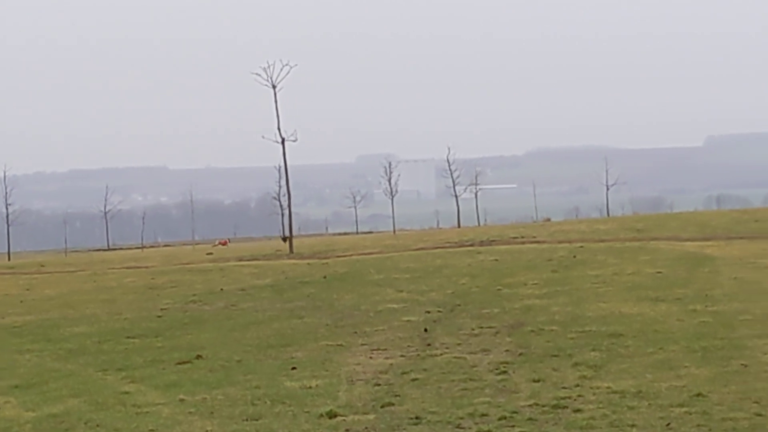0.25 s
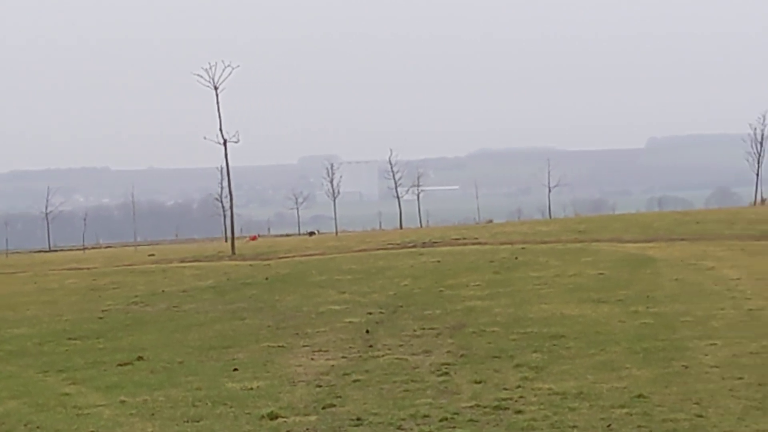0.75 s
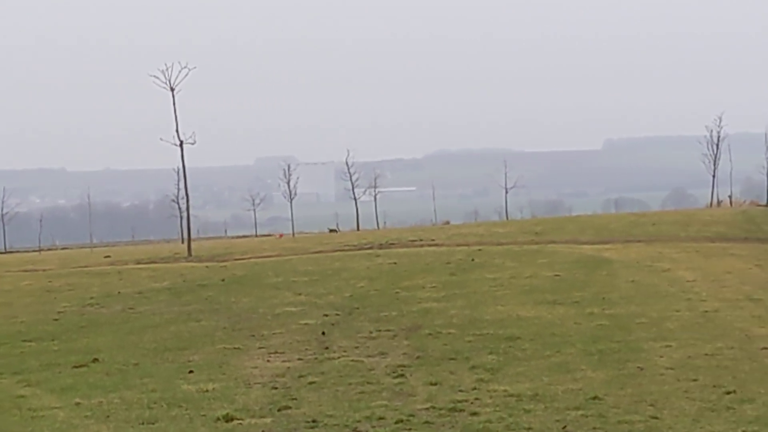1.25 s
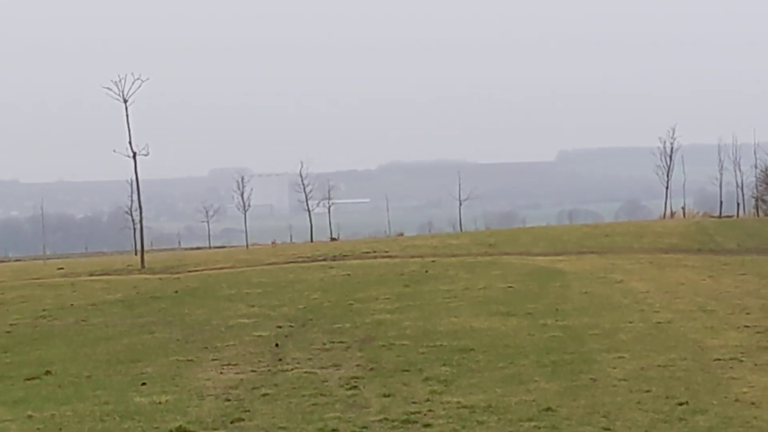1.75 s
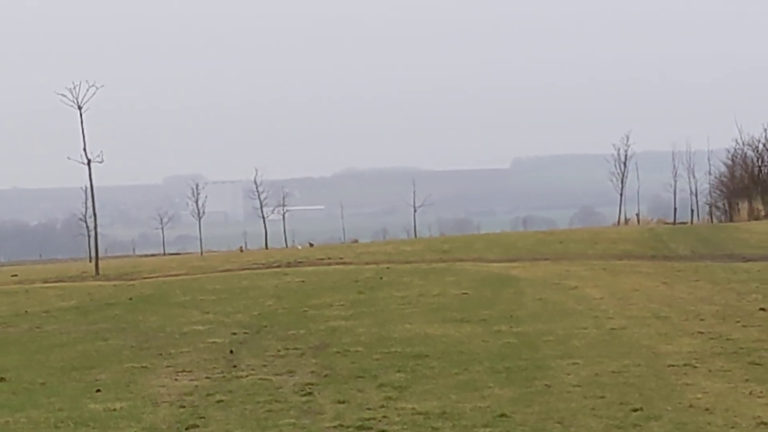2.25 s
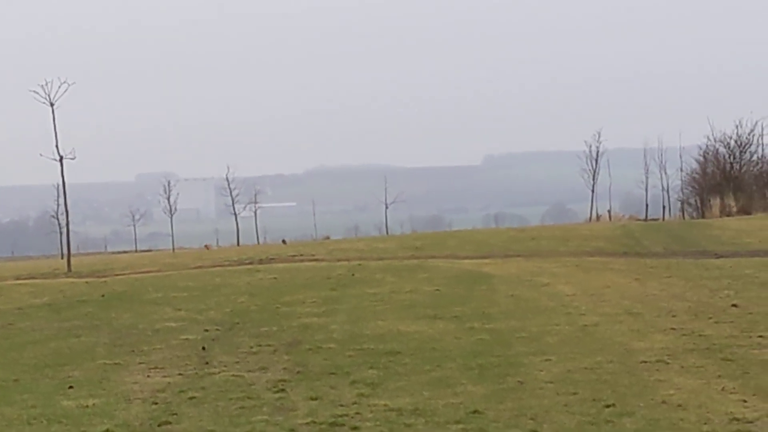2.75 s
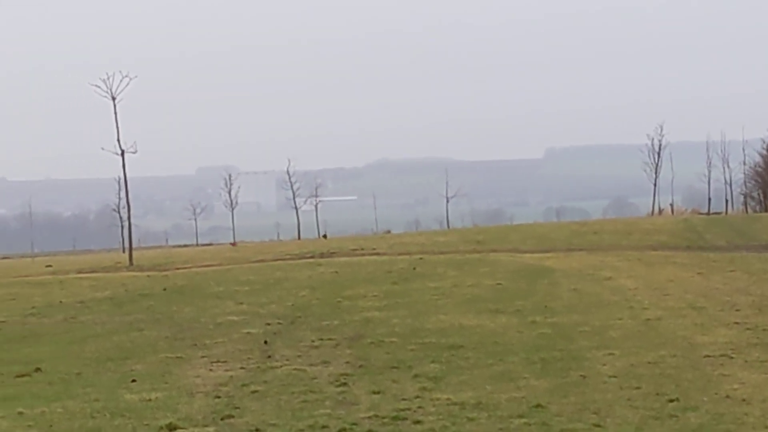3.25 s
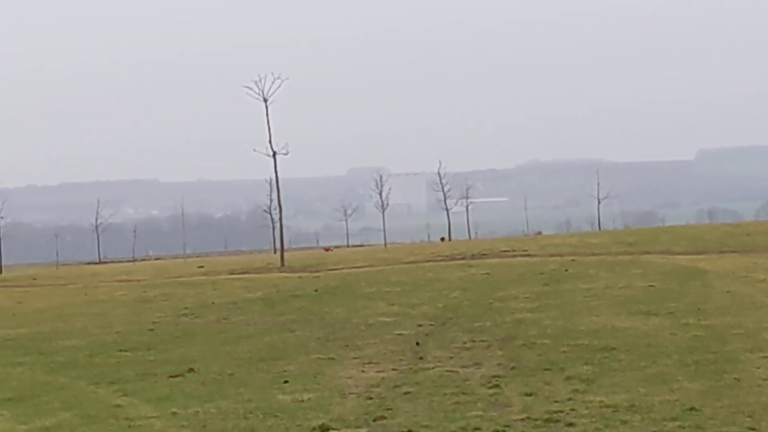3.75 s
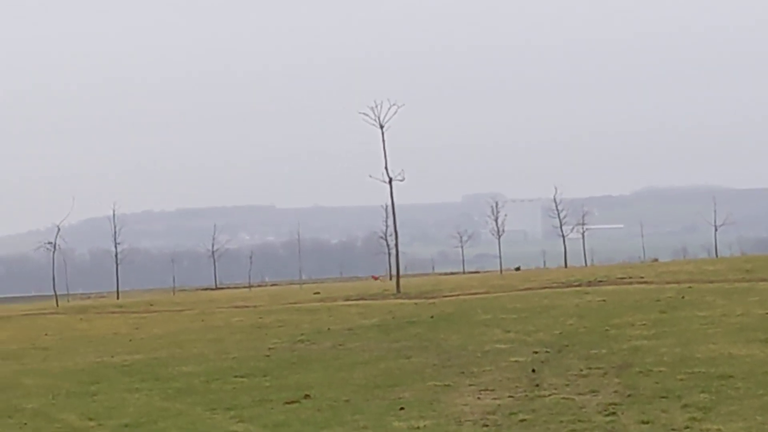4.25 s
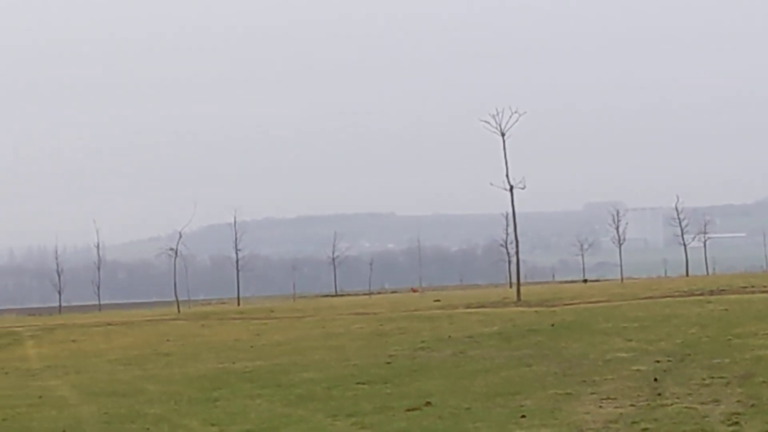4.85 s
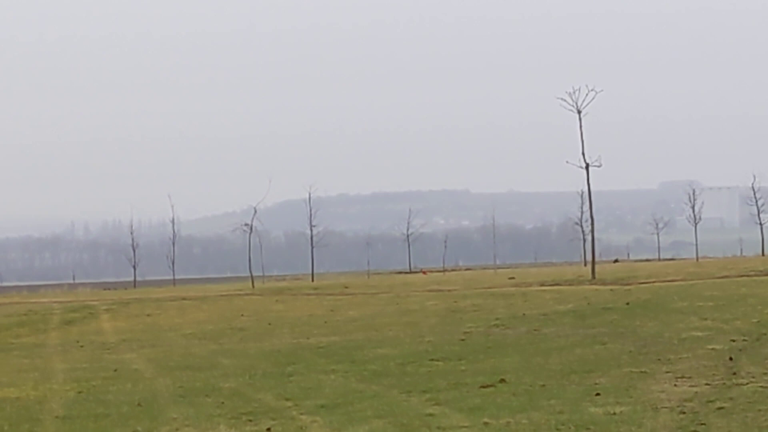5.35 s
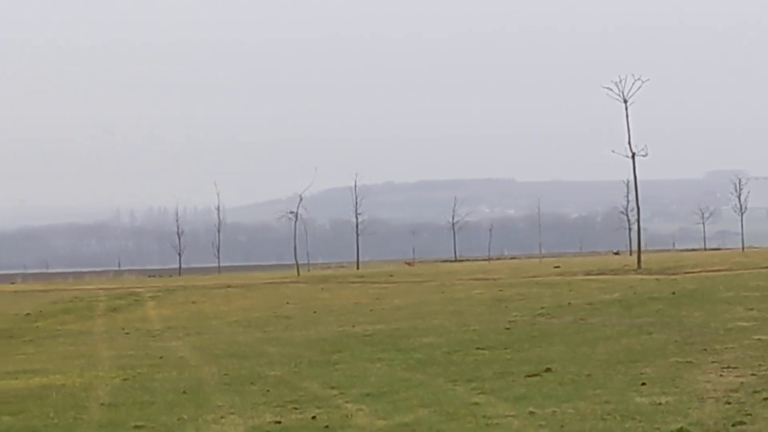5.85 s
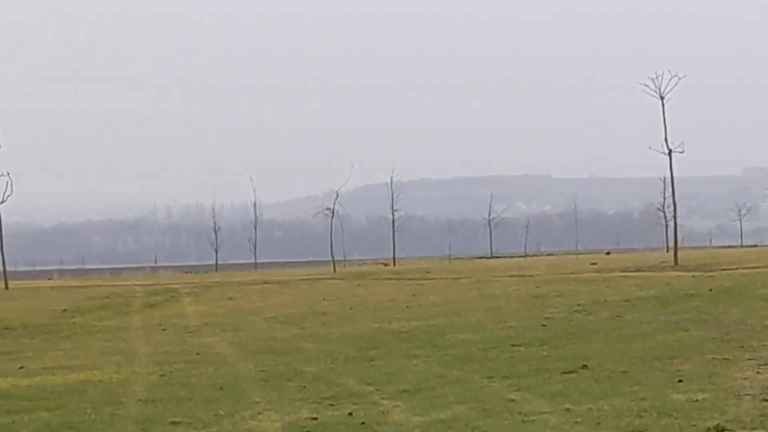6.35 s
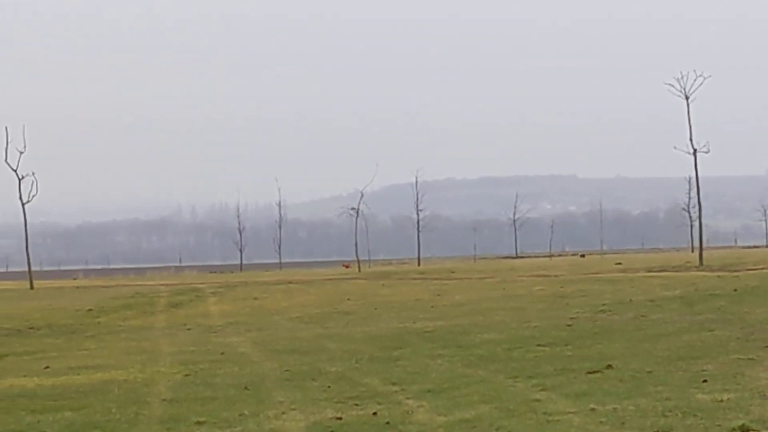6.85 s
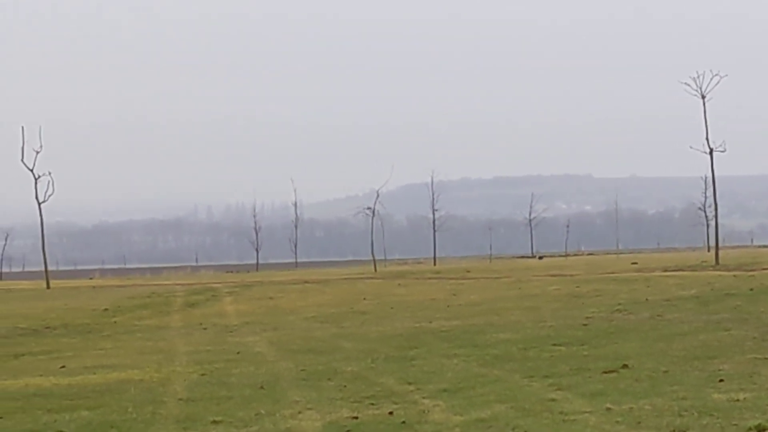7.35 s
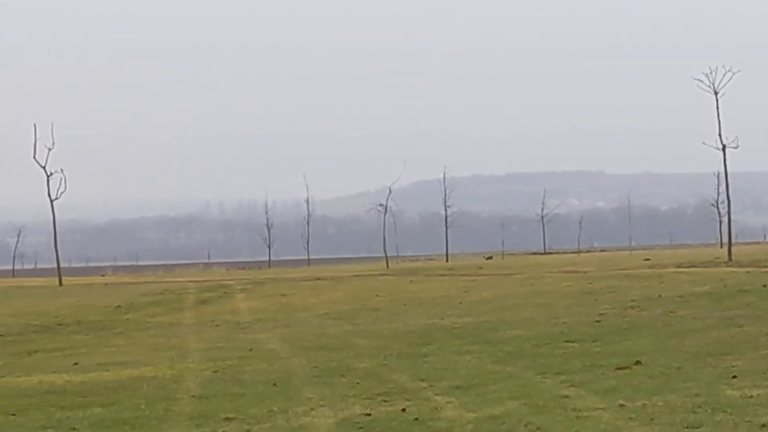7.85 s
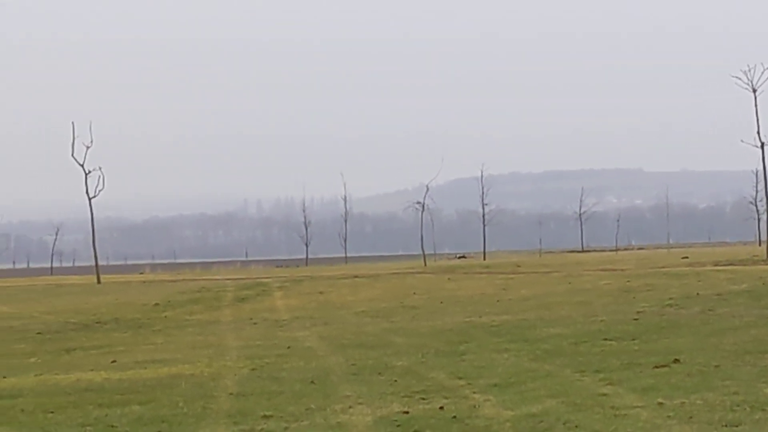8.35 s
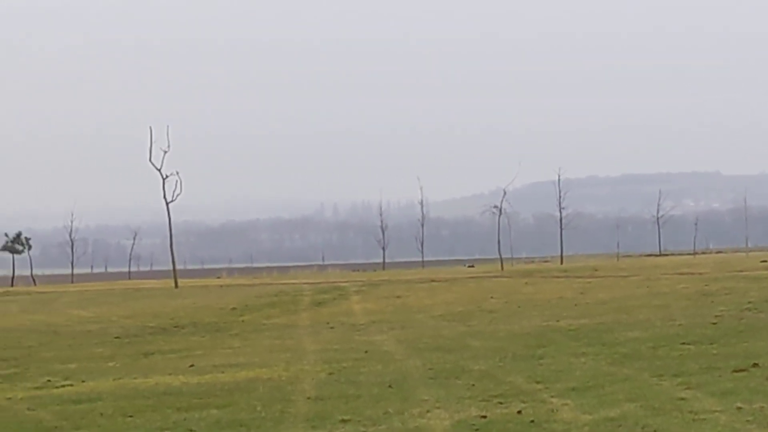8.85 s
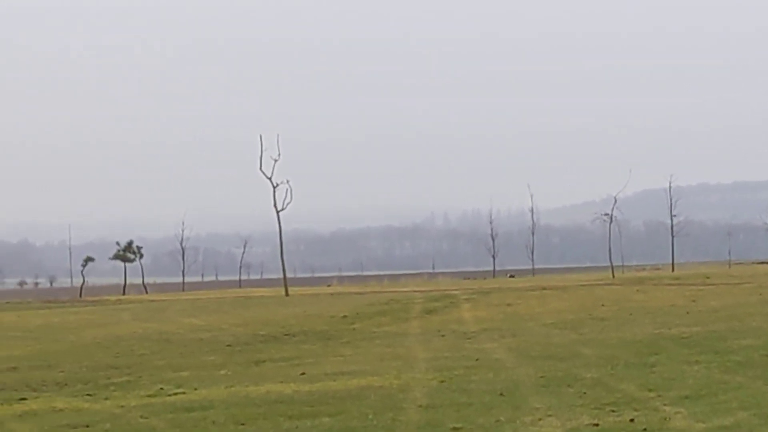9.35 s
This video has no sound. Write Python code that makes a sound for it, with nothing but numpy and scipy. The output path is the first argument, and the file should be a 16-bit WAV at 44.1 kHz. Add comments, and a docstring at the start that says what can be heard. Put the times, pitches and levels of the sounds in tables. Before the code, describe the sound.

A small single-cylinder engine idles close to a stereo microphone in an open field, running throughout about 9.6 seconds. It fires around eighteen times a second, slightly unevenly: dull low thuds with a short noisy bark and a bright, faint casing rattle. Underneath, a rotor hums near 90 to 100 hertz with buzzing overtones and thin hiss; it winds up at first, then sags and recovers every second or so. Wind hits the microphone in irregular low thumps: a heavy cluster from 1.2 to 2 seconds, lighter ones near 2.6, then a lull. At about 3.4 a single hoarse, high bird chirp rises and falls. Thumps return around 4.0 to 4.3, strongly near 5, and in a dense run from 6.0 to 7.1. Weaker, scattered buffets follow to 8.7, with one more near 9.3. The hum is fullest around 6.8, then its drone thins near 7.4. The engine is still running at the end.

```python
"""Engine idling in an open field

A small single-cylinder engine idles close to the microphone: each firing thuds in ringing exhaust modes,
barks as a puff of noise and rattles the casing. A rotor hums in sine partials and hisses in filtered
noise, sagging under each load and winding up again. Wind buffets the microphone in low thumps of noise,
and a bird chirps once, as a gliding sine."""
import sys
import numpy as np
from scipy import signal
from scipy.fft import rfft, irfft
from scipy.io import wavfile
from scipy.ndimage import uniform_filter1d, minimum_filter1d

SR = 44100
rng = np.random.default_rng(int(sys.argv[2]) if len(sys.argv) > 2 else 0)


def generate_wav(sig):
    """Save sig (samples, or channels by samples) to the path in sys.argv[1] as 16-bit PCM at SR."""
    pcm = np.round(np.clip(np.atleast_2d(sig).T, -1, 1) * 32767).astype(np.int16)
    wavfile.write(sys.argv[1], SR, pcm)


N = 423360
TIME = np.arange(N) / SR
FREQ = np.maximum(np.arange(N // 2 + 1) * SR / N, 1)


def undb(db):
    """Turn decibels into gain."""
    return 10 ** (np.asarray(db) / 20)


def unit(x):
    """Scale to an rms of 1."""
    return x / np.sqrt(np.mean(x ** 2))


def curves(table):
    """Draw each column of a table as a curve over time."""
    seconds, *columns = np.transpose(table)
    return [np.interp(TIME, seconds, column) for column in columns]


def walk(rate_hz):
    """Wander slowly: random levels, each held for 1 / rate, then smoothed twice."""
    hold = max(int(SR / rate_hz), 1)
    steps = np.repeat(rng.standard_normal(N // hold + 1), hold)
    return unit(uniform_filter1d(uniform_filter1d(steps, hold), hold)[:N])


def resonances(table, hz):
    """Gain at the given frequencies of a set of steep resonances, added as power."""
    power = 0
    for center_hz, width_hz, db in table:
        offset = (hz / center_hz - center_hz / hz) * center_hz / width_hz
        power = power + undb(2 * db) / (1 + offset ** 2 * 2) ** 1.3
    return np.sqrt(power)


def shape(x, gain):
    """Filter by a gain for each frequency."""
    return irfft(rfft(x) * gain, N)


# How far the right port lags behind the left for sound from the engine.
# Each row: frequency in Hz, phase lag in radians.
PORT_LAG = [(0, 0), (400, 1.1), (1000, 2.5), (1250, 3.2), (2000, 6.1), (2800, 9.4), (3700, 12.3),
            (5200, 15.8), (7000, 22.0), (9200, 28.4), (16000, 47.2)]


def ports(x):
    """Sound from the engine's side reaches the right port about half a millisecond late."""
    lag = np.interp(FREQ, *np.transpose(PORT_LAG))
    return np.array([x, shape(x, np.exp(-1j * lag))])


# How much of the engine's noise the two ports hear unalike.
# Each row: frequency in Hz, share of the power from 0 to 1.
UNALIKE = [(100, 0.13), (1250, 0), (1650, 0.27), (2300, 0.3), (2800, 0.01), (3400, 0.04), (5100, 0.09),
           (7600, 0.22), (16000, 0.8)]


def turbulence(envelope, gain):
    """Gated, filtered noise that the two ports hear partly alike, and least alike at the very top."""
    own = np.clip(np.interp(FREQ, *np.transpose(UNALIKE)), 0, 1)
    direct = ports(shape(envelope * rng.standard_normal(N), gain * np.sqrt(1 - own)))
    separate = shape(envelope * rng.standard_normal((2, N)), gain * np.sqrt(own))
    return unit(direct + separate)


def strikes(times, sizes, response):
    """Place one copy of a response at each time."""
    train = np.zeros(N)
    train[np.clip(times * SR, 0, N - 1).astype(int)] = sizes
    return signal.oaconvolve(train, response)[:N]


def burst(rise_s, decay_s):
    """Envelope that opens quickly and dies away."""
    t = TIME[:SR // 10]
    return (1 - np.exp(-t / rise_s)) * np.exp(-t / decay_s)


# The idle speed. Each row: time in seconds, firings per second in Hz.
IDLE_SPEED = [(0.0, 17.277), (1.0, 17.673), (1.44, 18.316), (1.94, 17.184), (2.0, 18.089), (2.24, 17.282),
              (3.04, 17.766), (3.34, 17.515), (4.44, 18.431), (4.56, 17.964), (5.76, 18.315),
              (6.36, 17.546), (7.1, 18.115), (7.5, 17.656), (8.38, 18.031), (8.56, 17.237), (9.0, 18.167),
              (9.6, 17.788)]
START_TURN = 0.188  # share of the first cycle that has passed at the start


def firing_times(jitter_s=0.0002):
    """The cylinder fires once a cycle, never quite on time."""
    turns = START_TURN + np.cumsum(curves(IDLE_SPEED)[0]) / SR
    times = np.interp(np.arange(1, int(turns[-1]) + 1), turns, TIME)
    return times + jitter_s * rng.standard_normal(len(times))


# Exhaust and housing modes that every firing rings.
# Each row: frequency in Hz, time to fade by 60 dB in seconds, relative level in dB.
EXHAUST_MODES = [(98.3, 0.2, -23.5), (145.2, 0.23, -36), (161.8, 0.12, -19), (192, 0.25, -38.5),
                 (292, 0.0095, -25.5), (331, 0.056, -23), (368.4, 0.061, -21.5), (624.6, 0.051, -32),
                 (826, 0.0058, -35)]
# Hardness of the thud, which lifts its upper modes and thins the lowest when above zero.
# Each row: time in seconds, hardness in dB.
THUD_HARDNESS = [(0, 0), (2.3, -1), (4.5, 2), (9.6, 3.5)]


def exhaust(times, force_db, late_cycles=0.87, mode_scatter_db=0.5, low_cut_hz=70, hard_hz=170):
    """Each firing rings the exhaust modes, low ones later; a low cut at the microphone removes the deep bass."""
    t, thud = TIME[:SR // 5], 0
    hardness_db = np.interp(times, *np.transpose(THUD_HARDNESS))
    for hz, fade_s, mode_db in EXHAUST_MODES:
        ring = np.sin(2 * np.pi * hz * t) * np.exp(-np.log(1000) * t / fade_s)
        tilt = np.clip(np.log(hz / hard_hz) * 2, -1, 1)
        scatter_db = mode_scatter_db * rng.standard_normal(len(times))
        sizes = undb(mode_db + force_db + hardness_db * tilt + scatter_db)
        # the highest mode starts on time
        delay_s = late_cycles * (1 / hz - 1 / EXHAUST_MODES[-1][0])
        thud = thud + strikes(times + delay_s, sizes, ring)
    low_cut = signal.butter(4, low_cut_hz, "high", fs=SR, output="sos")
    return ports(signal.sosfilt(low_cut, thud))


# The engine body as it colours steady sound, used by the gas and the hum.
# Each row: frequency in Hz, width in Hz, relative level in dB.
BODY_MODES = [(104.3, 41, -4), (139, 20, -25), (201.2, 23, 1), (311, 17, -6), (383, 104, -1),
              (457.4, 34, 0), (597.4, 65, -5.5), (767, 180, -14.5), (940, 114, -17.5), (1394, 49, -20)]
# Level of the bark and rattle as heard, dipping under strong wind thumps, used by the gas and the casing.
# Each row: time in seconds, relative level of the exhaust bark in dB, level of the casing rattle in dB.
FIRING_LEVEL = [(0, -36, -42.5), (1.2, -38, -44), (1.45, -43, -46), (2.05, -43.5, -46.5),
                (2.45, -36.5, -42.5), (3.15, -44, -45.5), (3.6, -36.5, -42.5), (4.15, -39.5, -40),
                (4.7, -35.5, -43), (5.45, -40.5, -42), (6.4, -35, -40.5), (6.85, -41, -41),
                (7.8, -37.5, -42), (8.15, -46, -41.5), (8.8, -39, -41), (9.35, -43.5, -43),
                (9.6, -31.5, -43.5)]


def gas(times, force_db, puff_db=2.5, rumble_db=-37, puff_low_hz=560):
    """A puff of gas barks through the body after each firing, over a steady rumble."""
    body = resonances(BODY_MODES, FREQ)
    gate = strikes(times, undb(force_db), burst(rise_s=0.0001, decay_s=0.018))
    low_cut = 1 / np.sqrt(1 + (puff_low_hz / FREQ) ** 6)
    puff = turbulence(gate, body * low_cut)
    rumble = turbulence(undb(1.2 * walk(6)), body)
    return puff * undb(curves(FIRING_LEVEL)[0] + puff_db) + rumble * undb(rumble_db)


# Loads that drag the rotor down.
# Each row: start in seconds, length in seconds, drop in Hz that it would settle at if the load stayed on.
ROTOR_LOADS = [(0.561, 0.38, 27.97), (1.21, 0.26, 32.15), (2.4, 0.22, 29.7), (3.14, 0.35, 27.5),
               (3.749, 0.38, 22.92), (5.239, 0.24, 27.7), (6.27, 0.16, 32.5), (6.86, 0.3, 28.26),
               (7.4, 0.3, 24.4), (7.91, 0.34, 21.8), (8.571, 0.4, 23.62)]
# pitch at the start and when running free; time the rotor's inertia takes to follow a load
START_HZ, FREE_HZ, INERTIA_S = 90.7, 104.05, 0.43


def rotor_speed():
    """The rotor winds up toward its free speed; each load pulls it down until it lets go."""
    def settle(start_s):
        """Approach from 0 to 1, quick at first and then slower."""
        return 1 - np.exp(-np.maximum(TIME - start_s, 0) / INERTIA_S)
    sag_hz = sum(drop_hz * (settle(s) - settle(s + length_s)) for s, length_s, drop_hz in ROTOR_LOADS)
    return START_HZ + (FREE_HZ - START_HZ) * settle(0) - sag_hz


# Casing resonances. Each row: frequency in Hz, width in Hz, relative level in dB.
CASING_MODES = [(1204, 770, -0.5), (1704, 46, 4), (2248, 505, 3.5), (3054, 360, -1.5), (3190, 256, -4.5),
                (4680, 1830, -9.5), (5358, 420, -2), (6030, 1840, -6), (7090, 295, -2), (8207, 470, -4.5),
                (9100, 750, -11.5), (9810, 250, -8), (10840, 720, -13.5), (11880, 600, -9.5),
                (12620, 510, -8), (14100, 940, -11.5), (14400, 580, -37)]
# How well the rotor carries to the microphone, used by the casing and the hum.
# Each row: time in seconds, then relative levels in dB of the low drone, the upper whine and the hiss.
ROTOR_CARRY = [(0, 4.5, 2, -40), (1.5, 0.5, 0, -40), (3.3, -0.5, -1.5, -41), (4.3, 2, -4, -40),
               (5.5, 1.5, 1, -40.5), (6.8, 7, 2.5, -40), (7.4, -9, 6, -41.5), (8.3, 2, -2, -41.5),
               (9.6, -1, -2, -41.5)]
# drone and hiss grow with the rotor's pitch above its usual one
USUAL_HZ, DRONE_DB_PER_HZ, HISS_DB_PER_HZ = 95, 0.5, 0.3456


def casing(times, force_db, rotor_hz, hiss_db=1.5, rattle_low_hz=5000, tail_db=-14):
    """The rotor hisses in the casing, louder as it speeds up; each firing adds a short bright rattle."""
    colour = resonances(CASING_MODES, FREQ)
    hiss = turbulence(undb(1.05 * walk(90)), colour)
    sizes = undb(force_db + 1.8 * rng.standard_normal(len(times)))
    snap = burst(rise_s=0.0002, decay_s=0.0034)
    tail = undb(tail_db) * burst(rise_s=0.0025, decay_s=0.042)
    gate = strikes(times, sizes, snap + tail)
    low_cut = 1 / np.sqrt(1 + (rattle_low_hz / FREQ) ** 4)
    rattle = turbulence(gate, colour * low_cut)
    rush_db = curves(ROTOR_CARRY)[2] + HISS_DB_PER_HZ * (rotor_hz - USUAL_HZ)
    return hiss * undb(rush_db + hiss_db) + rattle * undb(curves(FIRING_LEVEL)[1])


# Partials of the hum, from the fundamental up: each entry is a relative level in dB.
HUM_PARTIALS = [-28.5, -31, -36, -50, -33, -48.5]


def hum(rotor_hz, flutter_db=2.5, direct=0.21):
    """The hum drones louder with speed; its partials swell as they slide across the body resonances."""
    hz = rotor_hz * (1 + 0.002 * walk(25))
    phase = 2 * np.pi * np.cumsum(hz) / SR
    body = direct + resonances(BODY_MODES, FREQ)
    drone_db, whine_db, _ = curves(ROTOR_CARRY)
    drone_db = drone_db + DRONE_DB_PER_HZ * (rotor_hz - USUAL_HZ)
    tone = 0
    for k, partial_db in enumerate(HUM_PARTIALS, 1):
        # the two lowest partials are the drone, the rest the whine
        level_db = partial_db + (drone_db if k <= 2 else whine_db) + flutter_db * walk(12)
        tone = tone + undb(level_db) * np.interp(k * hz, FREQ, body) * np.sin(k * phase)
    return ports(tone)


# Colour of the wind on the microphone. Each row: frequency in Hz, relative level in dB.
WIND_COLOUR = [(20, -24), (45, -15.5), (65, -14), (90, 0), (130, 3.5), (200, -0.5), (250, -17), (330, -21),
               (450, -38.5), (700, -49.5), (1500, -76)]
# The breeze between the thumps, which slackens. Each row: time in seconds, relative level in dB.
BREEZE_LEVEL = [(0, -33.5), (4.8, -35), (7.4, -42), (9.6, -41)]
# Wind thumps. Each row: time in seconds, relative peak level in dB, seconds from the peak until the power
# falls to 37 percent, brightness as twice the dB by which small eddies are weighted over large ones.
WIND_THUMPS = [(0.22, -17.5, 0.067, -31), (1.06, -16.5, 0.048, -12), (1.238, -9.5, 0.036, -13),
               (1.423, -3, 0.046, -5), (1.463, -2.5, 0.026, -22), (1.55, -6, 0.053, 25),
               (1.636, -11, 0.028, 5), (1.861, -3.5, 0.02, 21), (1.918, -6, 0.018, 9),
               (2.033, -14.5, 0.051, 14), (2.405, -18, 0.03, 13), (2.576, -10.5, 0.029, 6),
               (2.655, -13.5, 0.012, -4), (4.04, -9.5, 0.02, -15), (4.177, -6, 0.03, -6),
               (4.27, -8.5, 0.053, -12), (4.865, -5.5, 0.018, 19), (4.958, -2.5, 0.028, -17),
               (5.05, -4, 0.02, -1), (5.3, -22, 0.13, 9), (5.461, -11.5, 0.014, -15), (6.03, -12, 0.033, 8),
               (6.255, -7.5, 0.04, 5), (6.34, -15, 0.057, 10), (6.516, -6.5, 0.023, 11),
               (6.635, -5.5, 0.017, 15), (6.833, -9.0, 0.022, -8), (6.92, -2.5, 0.039, 8),
               (7.007, -10, 0.024, 15), (7.148, -14, 0.014, 7), (7.602, -12, 0.025, 14),
               (7.693, -10.5, 0.013, -3), (7.92, -17.5, 0.047, -9), (8.099, -11, 0.032, 10),
               (8.268, -7.5, 0.03, 28), (8.49, -11.5, 0.021, 30), (8.709, -13, 0.028, 7),
               (9.262, -8.2, 0.013, -10)]


def wind(db=-3.5, split_hz=150, own_share=0.32, edge_hz=300, edge_db=6):
    """Eddies hit the ports as low thumps, partly shared; a light breeze flutters between them."""
    hz, wind_db = np.transpose(WIND_COLOUR)
    colour = undb(np.interp(np.log(FREQ), np.log(hz), wind_db))
    shared = np.sqrt(1 - own_share) * rng.standard_normal(N)
    separate = np.sqrt(own_share) * rng.standard_normal((2, N))
    air = shape(shared + separate, colour)
    # eddies of like strength follow each other closely within a thump
    air = air / np.sqrt(uniform_filter1d(np.mean(air ** 2, axis=0), size=1800))
    low = shape(air, 1 / (1 + (FREQ / split_hz) ** 4))
    # undb of doubled decibels gives power
    low_power = high_power = undb(2 * (curves(BREEZE_LEVEL)[0] + 4.0 * walk(9.3)))
    for s, peak_db, length_s, brightness in WIND_THUMPS:
        swell = np.exp(-np.minimum(((TIME - s) / length_s) ** 2, 50))
        power = undb(2 * (peak_db + db)) * swell
        # small eddies are heard above the split
        high_share = 1 / (1 + undb(-brightness))
        low_power = low_power + 2 * power * (1 - high_share)
        high_power = high_power + 2 * power * high_share
    # the hardest thumps tear into smaller eddies and reach higher
    edge = shape(air, 1 / (1 + (edge_hz / FREQ) ** 6)) * undb(edge_db) * (low_power + high_power)
    return low * np.sqrt(low_power) + (air - low) * np.sqrt(high_power) + edge


# The bird's chirp. Each row: time in seconds, pitch in Hz, relative level in dB.
CHIRP_PATH = [(3.33, 3150, -64), (3.38, 3470, -45), (3.43, 3646, -45), (3.46, 4080, -47), (3.5, 3970, -45),
              (3.52, 3660, -43), (3.56, 3270, -58)]
# hoarseness: scatter of the pitch (share of it) and of the level (dB)
CHIRP_ROUGH, CHIRP_FLICKER_DB = 0.03, 3.5


def bird(echo_db=-3, echo_s=0.042):
    """One hoarse chirp that rises and falls, blurred by scatter off the ground."""
    hz, db = curves(CHIRP_PATH)
    sounding = (TIME > CHIRP_PATH[0][0]) & (TIME < CHIRP_PATH[-1][0])
    level = sounding * undb(db + CHIRP_FLICKER_DB * walk(120))
    phase = 2 * np.pi * np.cumsum(hz * (1 + CHIRP_ROUGH * walk(300))) / SR
    call = level * np.sin(phase)
    tail = rng.standard_normal((2, SR // 4)) * np.exp(-TIME[:SR // 4] / echo_s)
    tail = tail / np.sqrt(np.sum(tail ** 2, axis=1, keepdims=True))
    return call + undb(echo_db) * signal.oaconvolve(call[None], tail, axes=1)[:, :N]


UNEVEN_DB = 1.4  # how unevenly the cylinder fires from cycle to cycle


def scene():
    """Engine, humming rotor, wind and bird in the open air."""
    times, rotor_hz = firing_times(), rotor_speed()
    force_db = UNEVEN_DB * rng.standard_normal(len(times))
    engine = exhaust(times, force_db) + gas(times, force_db) + casing(times, force_db, rotor_hz)
    return engine + hum(rotor_hz) + wind() + bird()


def record(dry, ceiling=1.0, hold_s=0.037, top_hz=15800):
    """The microphone drops the deepest bass, a limiter holds down the strongest peaks, the top is cut."""
    dry = signal.sosfilt(signal.butter(2, 30, "high", fs=SR, output="sos"), dry)
    hold = max(int(hold_s * SR), 1)
    safe_gain = np.minimum(1, ceiling / (np.abs(dry).max(axis=0) + 1e-9))
    limited = dry * uniform_filter1d(minimum_filter1d(safe_gain, hold), hold)
    return signal.sosfilt(signal.ellip(10, 0.2, 80, top_hz, fs=SR, output="sos"), limited)


dry = scene()
out = record(dry)
generate_wav(out)
```